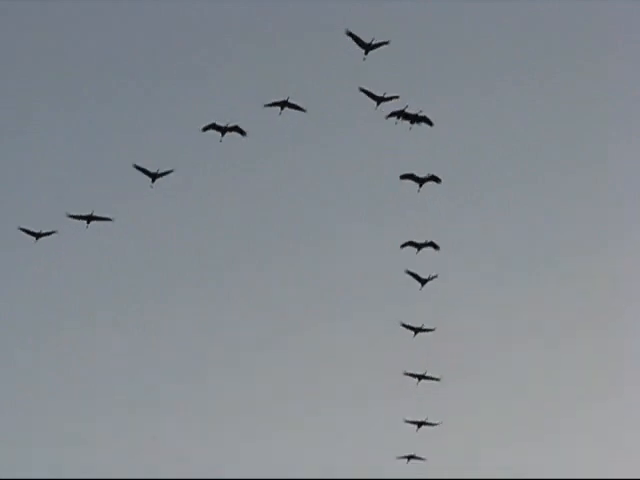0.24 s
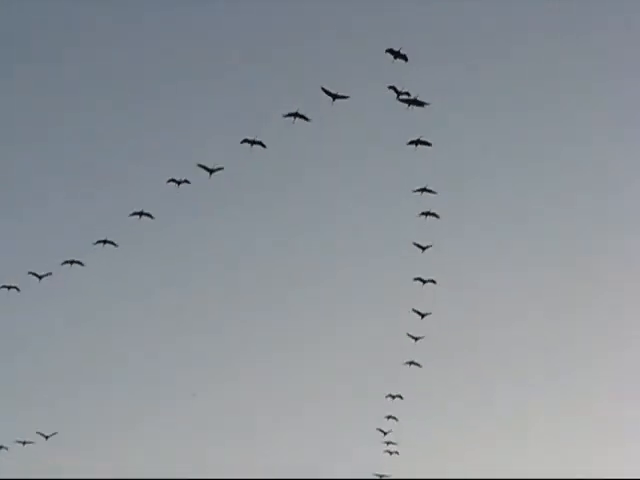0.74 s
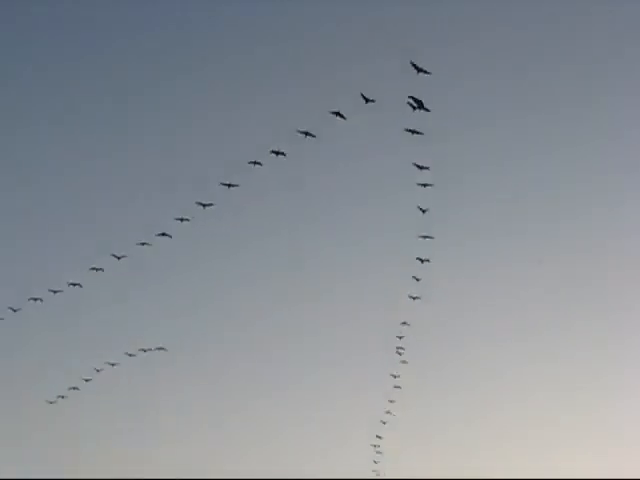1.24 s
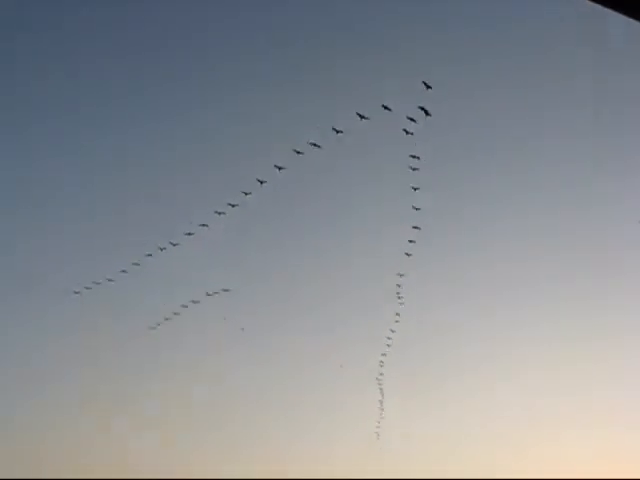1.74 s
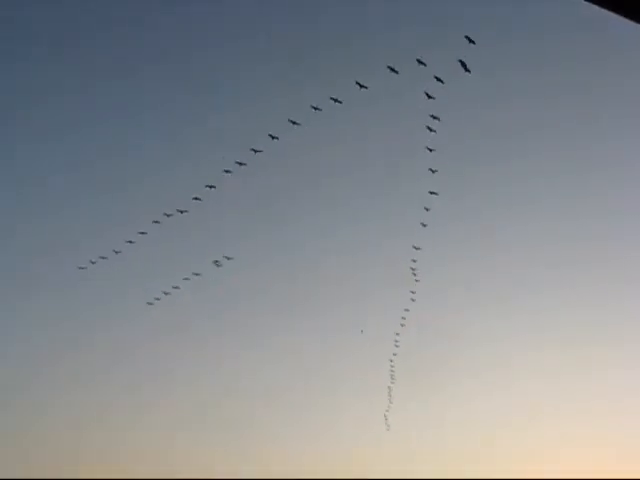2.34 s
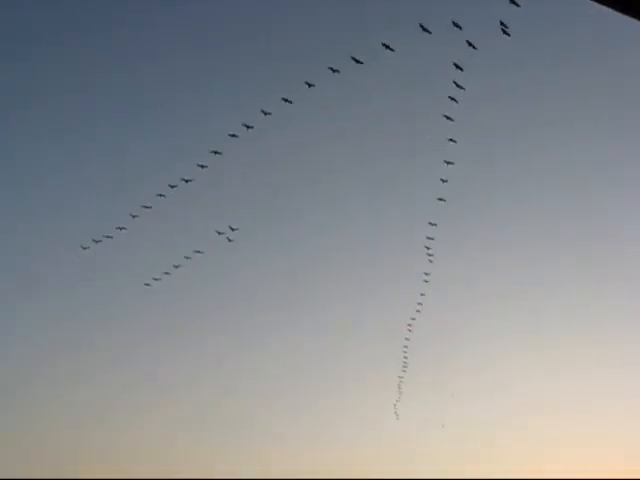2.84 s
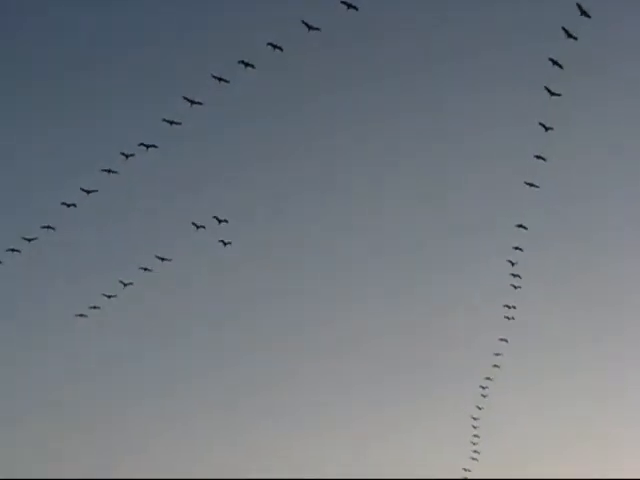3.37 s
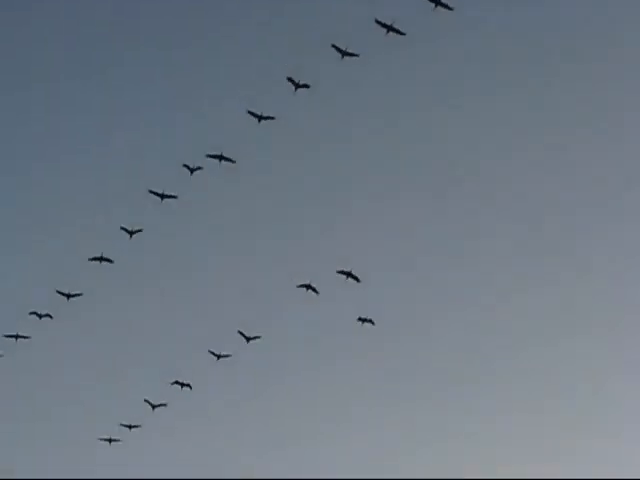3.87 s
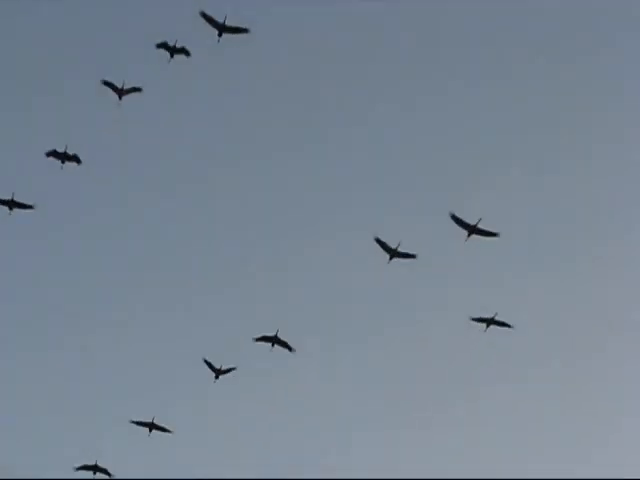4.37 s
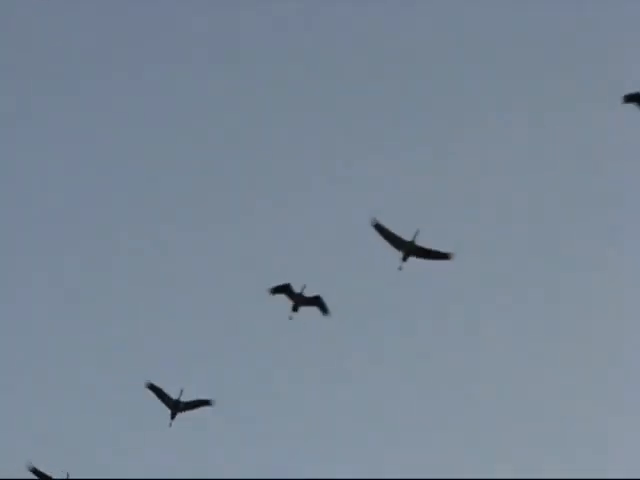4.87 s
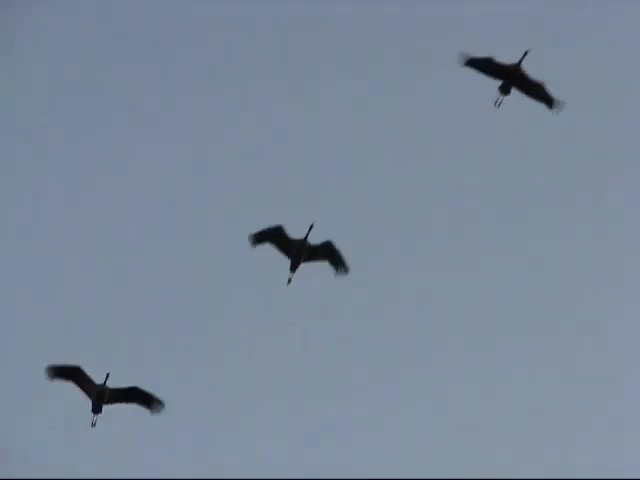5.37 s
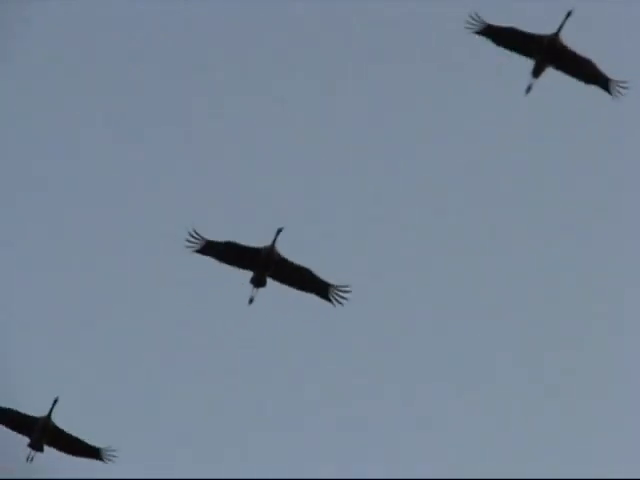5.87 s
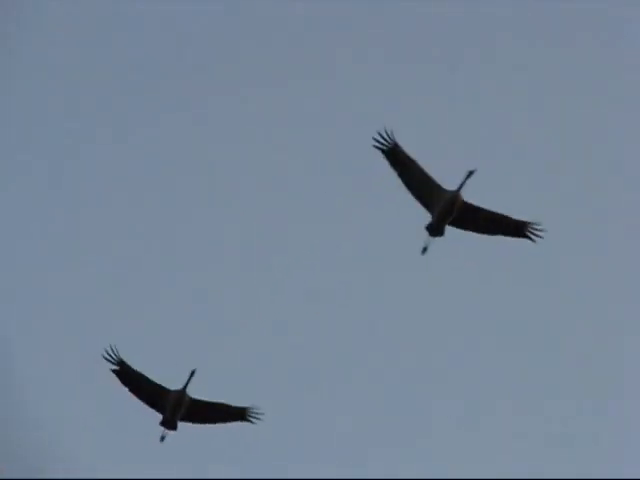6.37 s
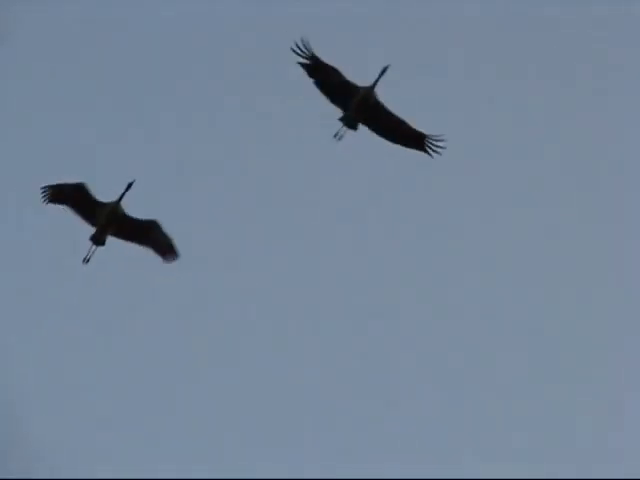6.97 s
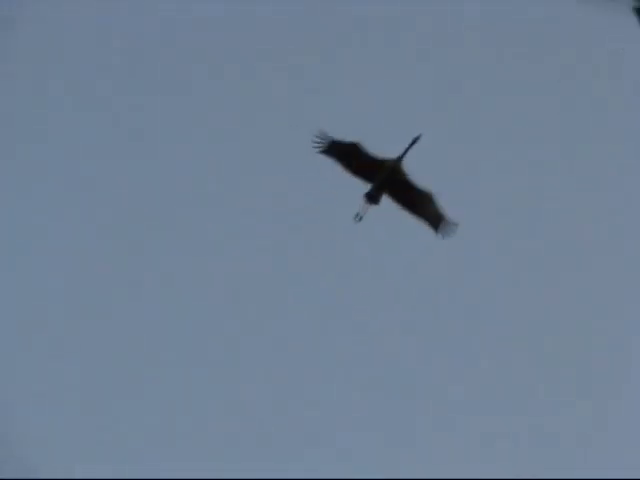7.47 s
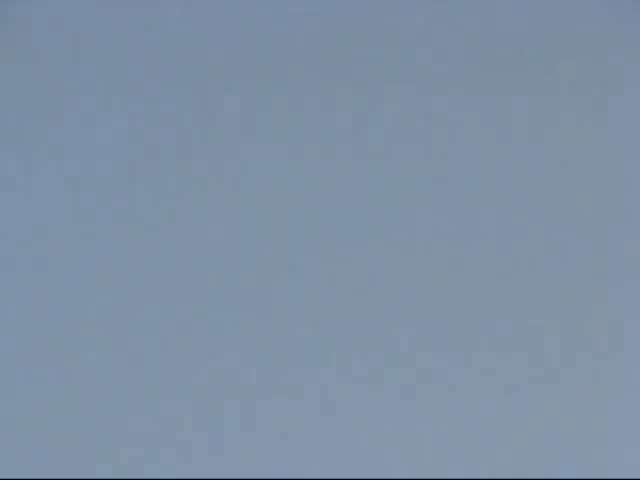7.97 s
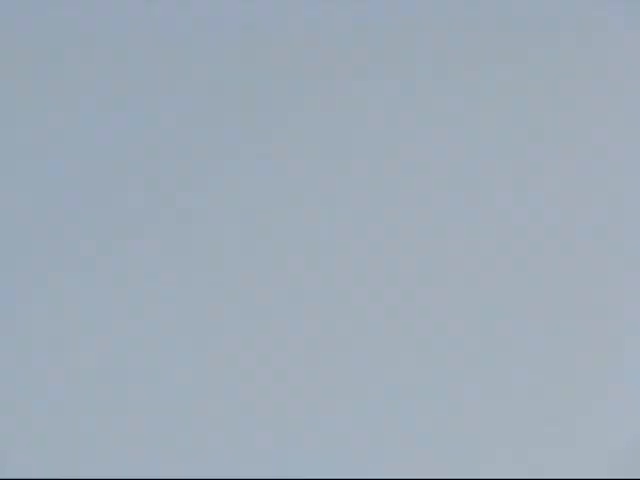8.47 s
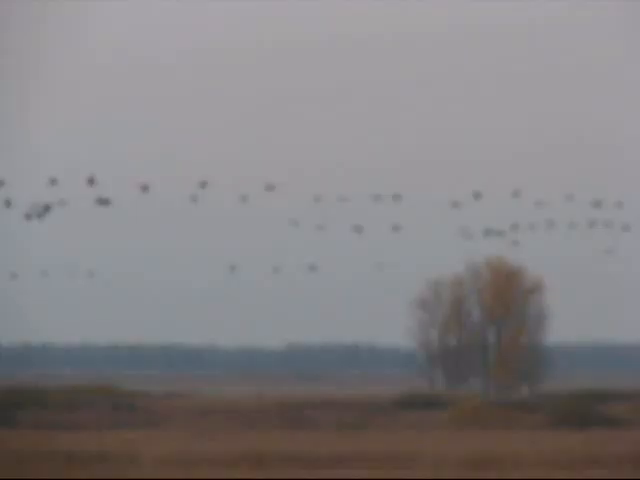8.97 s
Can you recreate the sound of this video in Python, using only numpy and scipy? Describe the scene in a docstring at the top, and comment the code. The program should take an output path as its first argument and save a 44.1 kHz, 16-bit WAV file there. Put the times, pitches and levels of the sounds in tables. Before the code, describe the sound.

Cranes bugle and whistle overhead in passing skeins above open wetland, with soft wind hiss and hard handling knocks close to the microphone.

```python
"""A soft wash of wind and hiss opens with knocks on a hand-held camera; skeins of cranes then pass overhead.
Adults bugle in rough, trilled harmonics, the young whistle nearly pure notes, and far flocks come as echoes.
Knocks ring the camera body, a slipping grip creaks in runs of snaps, and electronics whine near 8 kHz.
Gain control ducks after the hard knocks, and the level steps down just before the end."""
import sys
import numpy as np
from scipy import signal
from scipy.fft import rfft, irfft
from scipy.io import wavfile
from scipy.ndimage import uniform_filter1d

SR = 44100
rng = np.random.default_rng(int(sys.argv[2]) if len(sys.argv) > 2 else 0)


def dump(signal):
    """Clip the signal to [-1, 1] and save it as 16-bit WAV at the path in sys.argv[1]."""
    limited = np.clip(np.atleast_2d(signal).T, -1, 1)
    pcm = np.round(limited * 32767).astype(np.int16)
    wavfile.write(sys.argv[1], SR, pcm)


N = 406602
TIME = np.arange(N) / SR


def amp(db):
    """Decibels to gain."""
    return 10 ** (np.asarray(db) / 20)


def unit(x):
    """Scales to rms 1."""
    return x / np.sqrt(np.mean(x ** 2) + 1e-20)


def read(points, hz):
    """Reads a curve of (Hz, value) points on a log-frequency axis."""
    f, value = np.transpose(points)
    return np.interp(np.log(hz + 1), np.log(f + 1), value)


def colour(x, points):
    """Filters by a spectrum in dB."""
    gain = amp(read(points, np.fft.rfftfreq(x.shape[-1], 1 / SR)))
    return irfft(rfft(x) * gain, x.shape[-1])


def highpass(x, hz):
    """Third-order high-pass."""
    return signal.sosfilt(signal.butter(3, hz, "high", fs=SR, output="sos"), x)


def drift(size, hz):
    """Smooth random wander, mostly below hz, cut from one second of rms 1."""
    f = np.fft.rfftfreq(SR, 1 / SR)
    spectrum = rfft(rng.standard_normal(SR)) * np.exp(-(f / hz) ** 2)
    return unit(irfft(spectrum, SR))[:size]


def swell(t, peak_s):
    """Rises to 1 at peak_s and dies away."""
    return t / peak_s * np.exp(1 - t / peak_s)


def surge(peak_s, level_db, rise, fall):
    """A gain that climbs to its peak and sinks again, each at its own dB per second."""
    below_peak_db = np.maximum(rise * (peak_s - TIME), fall * (TIME - peak_s))
    return amp(level_db - below_peak_db.clip(0, 100))


def pan(lean_db):
    """Left and right gains with a mean of 1; a positive lean favours the left."""
    gains = amp([[lean_db / 2], [-lean_db / 2]])
    return gains / gains.mean()


def add(mix, s, sound):
    """Adds a sound at time s, cut off at the end of the mix."""
    part = mix[..., round(s * SR):][..., :sound.shape[-1]]
    part += sound[..., :part.shape[-1]]


def scatter(x, t60):
    """Open-air echo: sparse reflections from ground and trees, different at each side."""
    t = np.arange(SR // 2) / SR
    sparse = rng.standard_normal((2, len(t))) * (rng.random((2, len(t))) < .04)
    taps = sparse * amp(-60 * t / t60) * (t > .004)
    taps /= np.linalg.norm(taps, axis=1, keepdims=True)
    crossed = taps + .15 * taps[::-1]  # a little of each side reaches the other
    return signal.fftconvolve(x[None], crossed, axes=1)[:, :N]


# Tone of the wash: (frequency [Hz], relative level [dB])
WASH_COLOUR = [(15, -44), (25, -15.5), (92, -21), (317, -10.5), (575, -9.5), (863, -1.5), (2000, -9.5),
               (2160, -11.5), (2610, -12), (5000, -18.5), (7310, -22.5), (8140, -18.5), (8830, -25.5),
               (14800, -31), (16000, -76)]
# Likeness of the two sides: (frequency [Hz], correlation [0-1])
SIDE_LIKENESS = [(60, 0.53), (150, 0.73), (380, 0.84), (950, 0.29), (2380, 0.23), (5980, 0.039),
                 (15000, 0.23)]
# Stereo lean of the wash: (frequency [Hz], left over right [dB])
SIDE_LEAN = [(60, -2.5), (180, -1.5), (550, -2.5), (1650, -3.0), (4970, -1.5), (15000, 0.5)]
# Strength of the breeze before the band shares below: (time [s], level [dB])
BREEZE_LEVEL = [(0, -1.5), (1.4, 0), (3, 0), (4.6, 0), (6.1, 0), (6.7, -2), (7.8, -4), (8.1, 5),
                (8.35, 7.5), (8.75, -0.5), (9.2, -4.5)]
# How far each band follows the breeze: (frequency [Hz], share of its dB [0-1])
BREEZE_SHARE = [(150, 0.8), (700, 0.97), (4000, 0.96), (12000, 0.15)]
WASH_DB = -45.5  # overall rms


def wash(patchy_db=1.76, flicker_db=0.9):
    """Wind over the marsh and microphone hiss: noise shaped frame by frame, in drifting patches."""
    frames, hz = N // 256 + 5, np.fft.rfftfreq(1024, 1 / SR)
    a, b, c, d, patches = rng.standard_normal((5, frames, 513))
    patches = unit(uniform_filter1d(uniform_filter1d(patches, 9, axis=0), 10, axis=1))
    flicker = unit(uniform_filter1d(rng.standard_normal((frames, 1)), 5, axis=0))
    same = np.clip(read(SIDE_LIKENESS, hz), -1, 1)
    left = a + 1j * b
    right = same * left + np.sqrt(1 - same ** 2) * (c + 1j * d)
    half_lean_db = read(SIDE_LEAN, hz) / 2
    sides = np.array([left * amp(half_lean_db), right * amp(-half_lean_db)])
    level_db = read(WASH_COLOUR, hz) + patchy_db * patches + flicker_db * flicker
    breeze_db = np.interp(np.linspace(0, N / SR, frames), *np.transpose(BREEZE_LEVEL))
    sides = sides * amp(level_db + breeze_db[:, None] * read(BREEZE_SHARE, hz))
    noise = signal.istft(sides.swapaxes(1, 2), nperseg=1024, noverlap=768)[1][:, :N]
    return amp(WASH_DB) * unit(noise)


WHINE_HZ, FRAME_HZ = 7867.1, 29.97


def whine(level_db=-60):
    """An electronic tone whose phase flips at each picture frame, which makes it buzz."""
    flips = np.tanh(12 * np.sin(np.pi * FRAME_HZ * TIME))
    return amp(level_db) * unit(flips * np.sin(2 * np.pi * WHINE_HZ * TIME)) * pan(-9.5)


# Gusts on the microphone: (peak time [s], level [dB], rise [dB/s], fall [dB/s])
GUST_SURGES = [(4.84, -57, 400, 47), (8.52, -59, 123, 87), (9.08, -50, 226, 18)]


def buffet():
    """Low rumble of gusts, unrelated at each port."""
    rumble = colour(rng.standard_normal((2, N)), [(20, 6.5), (70, 2.5), (140, -3.0), (400, -27), (2000, -89)])
    return unit(rumble) * sum(surge(*gust) for gust in GUST_SURGES)


DRONE_PEAK_S, DRONE_DB = 5.92, -60
DRONE_RISE_DB_PER_S, DRONE_FALL_DB_PER_S = 3.5, 50


def drone():
    """A faint low drone far away: a narrow noise band that grows slowly and stops quickly."""
    spectrum = [(170, -44), (270, -14), (315, -2.0), (360, -11.0), (520, -20), (2000, -94)]
    band = colour(rng.standard_normal(N), spectrum)
    return unit(band) * surge(DRONE_PEAK_S, DRONE_DB, DRONE_RISE_DB_PER_S, DRONE_FALL_DB_PER_S)


def far_flock(count=30, level_db=-55, pitch_hz=900):
    """Many far birds, spread evenly with jitter and heard only by their echoes."""
    calls = np.zeros(N)
    for k, (when, voice, near) in enumerate(rng.random((count, 3))):
        hz = pitch_hz * 2 ** (0.95 * (voice - .5))
        call = bugle(0.174, hz, glide=0.0336, level_db=level_db - 10.0 * near, rough=0.63, trill=0.422,
                     bright_db=-5, upper_db=8.5)
        add(calls, (k + when) / count * N / SR, call)
    return scatter(calls, t60=0.72)


# Colour of skin on the shell: (frequency [Hz], relative level [dB])
BRUSH_COLOUR = [(300, -30), (2000, 3), (5600, 2), (7500, -8), (11000, -7), (15000, -17), (16500, -40)]
# Strokes of the palm: (peak time [s], level [dB], rise [dB/s], fall [dB/s])
BRUSH_STROKES = [(5.29, -50.5, 110, 86), (5.7, -56.5, 90, 25), (8.4, -61, 150, 30)]


def brushing(grain_db=3):
    """The palm brushes the shell: soft hiss with a grainy level."""
    grains = unit(uniform_filter1d(rng.standard_normal(N), size=200))
    hiss = colour(rng.standard_normal((2, N)), BRUSH_COLOUR) * amp(grain_db * grains)
    return unit(hiss) * sum(surge(*stroke) for stroke in BRUSH_STROKES)


# Colour of the grip's snaps: (frequency [Hz], relative level [dB])
SNAP_COLOUR = [(100, -44), (500, -19), (800, 2), (1200, 1), (1900, 1.5), (2500, 3), (3500, 5), (4400, -4),
               (6000, -9), (9000, -13.5), (13000, -42)]
SLIP_RISE_S, SLIP_HOLD = 0.0012, 0.8  # build-up time; share of the length before release


def slip(length, pitch_hz, squeak_db, snap_db, chatter_hz=340, chatter=0.71, uneven_db=3.0, grit=0.54,
         release_s=0.0042):
    """One slip of the grip: a fast, chattering run of tiny snaps, whose rate is heard as a squeak."""
    t = np.arange(SR // 25) / SR
    turns = np.cumsum(pitch_hz * (1 + .08 * drift(len(t), 400))) / SR
    beat = 1 + chatter * np.cos(2 * np.pi * (chatter_hz * t + rng.random()))
    grain = beat * amp(uneven_db * drift(len(t), 1200))
    clicks = np.diff(np.floor(turns), prepend=0)  # one per turn
    snaps = unit(colour(clicks * grain, SNAP_COLOUR))
    rub = unit(colour(rng.standard_normal((2, len(t))), SNAP_COLOUR))  # the sliding between the snaps
    release = np.exp(-np.maximum(t - SLIP_HOLD * length, 0) / release_s)
    press = np.minimum(t / SLIP_RISE_S, 1) * release
    squeak = amp(squeak_db) * np.cos(2 * np.pi * turns)
    return (squeak + amp(snap_db) * (snaps + grit * rub) / 2) * press * pan(-2.3)


# Slips of the grip: (time [s], nominal length [s], mean pitch [Hz], squeak gain [dB], snap gain [dB])
GRIP_SLIPS = [(2.4284, 0.0094, 1172, -33, -23), (2.4425, 0.012, 1093, -35, -25),
              (2.45, 0.007, 1150, -28, -32), (2.457, 0.013, 1138, -30, -41),
              (2.4695, 0.011, 1106, -35, -25.5), (2.4765, 0.01, 1153, -34, -22),
              (2.486, 0.0077, 1125, -31, -30), (2.492, 0.0052, 1150, -29, -23),
              (2.499, 0.0059, 1213, -25.5, -32), (2.508, 0.0078, 1103, -32, -41),
              (2.515, 0.0033, 1094, -25, -25.5), (2.5245, 0.0092, 1176, -29, -22),
              (2.539, 0.0093, 1173, -26.5, -30), (2.552, .008, 1160, -33, -30),
              (2.564, .006, 1103, -29, -28), (2.574, 0.0087, 1143, -33, -37), (2.585, 0.012, 904, -43, -37),
              (2.599, 0.022, 733, -37, -45)]


def creak(echo_db=-9):
    """The grip sticks and slips, then eases: the last slips are softer and lower."""
    out = np.zeros((2, N))
    for s, *row in GRIP_SLIPS:
        add(out, s, slip(*row))
    return out + amp(echo_db) * scatter(out.mean(0), t60=0.49)


def thud(t, thud_hz=490, peak_s=0.003):
    """The dull sound of the grip: a briefly swelling sine, only a cycle or a few long."""
    tone = np.sin(2 * np.pi * thud_hz * rng.normal(1, 0.0061) * t)
    return highpass(tone * swell(t, peak_s), 227)


# Colour of sliding contact: (frequency [Hz], relative level [dB])
SCRATCH_COLOUR = [(60, -62), (300, -36), (1200, 20.5), (1900, 6), (2450, 8.5), (2800, 11.5), (3500, 6.5),
                  (4400, 3), (5500, -3), (9000, -3.5), (15000, -25)]


def scratch(t, peak_s):
    """A puff of sliding contact on the shell, unrelated at each port."""
    return unit(colour(rng.standard_normal((2, len(t))), SCRATCH_COLOUR)) * swell(t, peak_s) / 2


# Modes of the camera body: (mean frequency [Hz], relative level [dB], time to fall 60 dB [s])
BODY_MODES = [(556, 2, 0.025), (729, -0.5, 0.052), (1003, 0.5, 0.05), (1278, 6.5, 0.019),
              (1842, -11.5, 0.068), (2413, -0.5, 0.011), (3140, -16, 0.028)]
THUD_DB = -28.5  # the grip's thud relative to the ring


def knock(t, ring_db, scratch_db, lean_db):
    """One touch: the body rings in a different phase at each port, the surfaces scratch, the grip thuds."""
    ring = 0
    for hz, db, t60 in BODY_MODES:
        mode_hz = hz * rng.normal(1, 0.035)
        port_phase = rng.normal(0, 1.0, (2, 1))
        ring = ring + amp(db - 60 * t / t60) * np.sin(2 * np.pi * mode_hz * t + port_phase)
    ring = highpass(ring * (1 - np.exp(-t / 0.000052)), 622)  # very short onset
    blow = ring / abs(ring).max() + amp(THUD_DB) * thud(t)
    return (amp(ring_db) * blow + amp(scratch_db) * scratch(t, peak_s=0.0011)) * pan(lean_db)


def tick(t, centre_hz, peak_s=0.00098, slope_db=14, tail_db=-20, tail_s=0.0093):
    """A tiny snap of the shell: noise sloping slope_db per octave around its centre, then a short rustle."""
    band = [(centre_hz / 8, -3 * slope_db), (centre_hz, 0), (centre_hz * 4, -2 * slope_db)]
    noise = unit(colour(rng.standard_normal((2, len(t))), band))
    return noise * (swell(t, peak_s) + amp(tail_db) * swell(t, tail_s)) / 2


# Knocks of the hand on the camera: (time [s], ring gain [dB], scratch gain [dB], left over right [dB])
HAND_KNOCKS = [ (0.047, -22.5, -15, -4.5), (0.221, -33, -52, -3), (0.282, -37, -52, -1),
               (0.343, -30.5, -40, -9), (0.411, -29, -47, -4), (2.044, -24, -29, -8),
               (2.301, -26, -18, -12), (2.3031, -9.5, -9, -3.5), (2.3053, -2.5, -10, -10.5),
               (2.309, -12, -21, 0), (2.831, -25, -32, -16), (3.358, -28.5, -54, -9), (3.523, -29, -45, -8),
               (6.269, -23, -41, -8), (6.297, -32, -52, -4), (6.324, -25.5, -37, -2), (6.452, -22, -27, -5),
               (6.491, -31, -31, -8), (7.9817, -10, -25, -12), (7.985, -13, -32, -8), (7.988, -6, -2, -7),
               (7.9898, 5.5, 0.5, -10.5), (7.9987, -12, -10, -1), (8.001, -7, -7, -1),
               (8.32, -27, -16.5, -2), (8.341, -28, -16, -10)]
# Thin dry ticks of the shell: (time [s], gain [dB], centre frequency [Hz])
SHELL_TICKS = [(5.664, -31, 3580), (5.689, -26.5, 7600), (5.962, -37.5, 8900), (6.115, -38, 12000),
               (6.61, -40, 12000), (7.506, -34, 4900), (7.768, -39, 8900)]
# Dull bumps of the hand: (time [s], gain [dB], mean pitch [Hz], time to peak [s])
HAND_BUMPS = [(0.047, -24, 500, 0.00084), (2.3035, -14.5, 590, 0.0018), (2.3055, -5.5, 1038, 0.00094),
              (7.9815, -14, 880, 0.0015), (7.99, -26, 705, 0.0017), (7.9911, -3, 1390, 0.00041),
              (2.449, -35, 520, .004), (2.982, -47, 393, 0.0037), (4.447, -29, 383, 0.0006),
              (5.869, -43, 324, 0.0054), (6.492, -37, 327, 0.00077), (6.513, -43.5, 264, 0.0034),
              (6.535, -46, 247, 0.0029), (8.312, -21.5, 483, 0.00044), (8.504, -19, 490, 0.00031),
              (9.097, -33.5, 393, 0.00047)]
PUSH_DB = -25  # low push of air relative to its bump


def handling(echo_db=-27):
    """Knocks, ticks, bumps and a stick-slip creak, carried through the body to the microphone."""
    out = creak()
    t = np.arange(SR // 12) / SR
    for s, *row in HAND_KNOCKS:
        add(out, s, knock(t, *row))
    for s, level_db, centre_hz in SHELL_TICKS:
        add(out, s, amp(level_db) * tick(t, centre_hz) * pan(-0.86))
    for s, level_db, thud_hz, peak_s in HAND_BUMPS:
        bump = thud(t, thud_hz, peak_s) + amp(PUSH_DB) * swell(t, 0.00093)
        add(out, s, amp(level_db) * bump * pan(-7))
    return out + amp(echo_db) * scatter(out.mean(0), t60=.15)


def peep(length, pitch_hz, glide, level_db, waver=0.016, flutter_db=4):
    """A faint, quavering note on a straight glide."""
    u = np.linspace(-.5, .5, round(length * SR))
    hz = pitch_hz * (1 + glide * u + waver * drift(len(u), 300))
    tone = np.sin(2 * np.pi * np.cumsum(hz) / SR) * amp(flutter_db * drift(len(u), 50))
    return amp(level_db) * unit(tone * signal.windows.tukey(len(u), .3))


# Tune shared by all whistles: (share of length [0-1], pitch [ratio], relative level [dB])
WHISTLE_TUNE = [(0, .97, -10), (.03, 1, -4), (.072, .8, -2), (.105, 1, 1), (.14, 1.01, 1), (.175, 1.13, 3),
                (.235, .98, -5), (.29, .945, -5), (.345, 1.025, -2), (.39, .87, 0), (.42, 1, 2),
                (.48, 1.01, 2.5), (.55, 1.08, 3), (.59, 1.04, 0), (.675, .91, 0), (.76, .935, 2),
                (.85, .885, 0), (1, .78, -6)]
FALL_FROM, FALL_SETTLE = 0.529, 0.064  # start and settling time of the closing fall [share of length]
# second harmonic of a whistle at OCTAVE_AT_DB; softer whistles lose OCTAVE_FOLLOW dB of it per dB
OCTAVE_DB, OCTAVE_AT_DB, OCTAVE_FOLLOW = -12, -36, 0.5


def whistle(length, pitch_hz, level_db, tail_db, warble=0.012, flutter_db=2):
    """A thin, nearly pure note: two scooped, quavering flicks, then a steadier fall."""
    u = np.linspace(0, 1, round(length * SR))
    at, ratios, dbs = np.transpose(WHISTLE_TUNE)
    fall = np.clip((u - FALL_FROM) / FALL_SETTLE, 0, 1)
    waver = 1 + warble * (1 - fall / 2) * drift(len(u), 320)
    phase = 2 * np.pi * np.cumsum(pitch_hz * np.interp(u, at, ratios) * waver) / SR
    octave_db = OCTAVE_DB + OCTAVE_FOLLOW * (level_db - OCTAVE_AT_DB)
    tone = np.sin(phase) + amp(octave_db) * (np.sin(2 * phase) + amp(-18) * np.sin(3 * phase))
    effort_db = np.interp(u, at, dbs) + tail_db * fall + flutter_db * drift(len(u), 170)
    return amp(level_db) * unit(tone * amp(effort_db) * signal.windows.tukey(len(u), .06))


# Whistles of the young: (time [s], length [s], base pitch [Hz], level [dB],
#   echo send relative to it [dB], closing fall relative to the tune [dB])
YOUNG_WHISTLES = [ (1.977, 0.14, 4120, -38, -4, -1), (2.145, 0.12, 4120, -49, -8, -17),
                  (2.232, 0.042, 3680, -50.5, 4, -5), (3.811, 0.13, 3974, -39, -3, 0.5),
                  (5.015, 0.048, 3480, -55.5, 3, -16), (5.062, 0.165, 3950, -47, -3, 0.5),
                  (5.11, 0.14, 4620, -50.5, 1.5, -1), (6.355, 0.17, 3723, -50.5, 2.5, -1.5),
                  (6.406, .19, 3615, -59.5, 5.5, 0), (7.843, 0.12, 3920, -48, 6, 0.5),
                  (7.903, 0.14, 4380, -46.5, 3, 5), (8.594, 0.12, 4360, -47, 1, -6),
                  (8.662, 0.1, 3640, -52.5, -1, 1)]
# Thin peeps of far birds: (time [s], length [s], mid pitch [Hz], glide [share of pitch], echo send level [dB])
FAR_PEEPS = [(6.45, 0.19, 5790, -.085, -63.5), (7.09, 0.244, 3560, -0.014, -60),
             (0.333, .045, 3470, -0.0045, -55), (0.395, .05, 3650, 0.042, -53),
             (5.195, .04, 3500, 0.015, -45.5)]


def young(air_loss_db=-8, blur=0.042):
    """Young birds, each direct and as an echo with more waver and less treble; far peeps are echo only."""
    direct, sent = np.zeros(N), np.zeros(N)
    for s, length, pitch_hz, level_db, echo_db, tail_db in YOUNG_WHISTLES:
        add(direct, s, whistle(length, pitch_hz, level_db, tail_db))
        add(sent, s, whistle(length, pitch_hz, level_db, tail_db, warble=blur) * amp(echo_db))
    for s, *row in FAR_PEEPS:
        add(sent, s, peep(*row))
    sent = colour(sent, [(5000, 0), (7500, air_loss_db)])
    return direct * pan(-1) + scatter(sent, t60=.24)


# Windpipe and bill of an adult: (frequency [Hz], relative level [dB])
THROAT_COLOUR = [(400, 34), (750, 1.5), (1100, 10.5), (1600, -5), (2400, -6.5), (3400, -6), (4300, -11),
                 (6000, -17), (9000, -55)]
TRILL_PER_S, TRILL_SWING, TRILL_DB = 21.4, 0.076, 6  # at trill 1: mean rate, pitch swing [share], level swing
ARCH, ARCH_PER_GLIDE = 0.0255, 0.255  # droop of both ends [share of pitch]; wide glides bend more
UPPER_FALL_DB = -2.2  # slope per harmonic from the third up, before the throat


def bugle(length, pitch_hz, glide, level_db, rough, trill, bright_db, upper_db, jitter=0.0555, rasp=1.0,
          uneven_db=-0.5):
    """Harmonics on a pitch arch; trill rolls flick it up and louder, uneven membrane beats make it rasp."""
    size = round(length * SR)
    u = np.linspace(-1, 1, size)
    arch = pitch_hz * (1 + glide * u / 2 - (ARCH + ARCH_PER_GLIDE * abs(glide)) * u ** 2)
    beat = 2 * np.pi * TRILL_PER_S * rng.normal(1, 0.0068) * np.arange(size) / SR
    roll = -trill * np.cos(beat + 0.725 * (1 - np.cos(beat)))  # each roll rises faster than it falls
    hz = arch * (1 + TRILL_SWING * roll + jitter * rough * drift(size, 221))
    turns = np.cumsum(hz) / SR
    harmonics_db = [0, bright_db]
    for k, z in enumerate(rng.standard_normal(size=4)):
        harmonics_db.append(upper_db + UPPER_FALL_DB * k + uneven_db * z)
    voice = np.zeros(size)
    for k, db in enumerate(harmonics_db, 1):
        gain = amp(read(THROAT_COLOUR, k * arch) + db + 3.2 * drift(size, 64))
        voice += gain * np.sin(2 * np.pi * (k * turns + rng.random()))
    roughness = 1 + rasp * rough * drift(size, 300)
    effort = amp(TRILL_DB * roll) * roughness * signal.windows.tukey(size, .18)
    return amp(level_db) * unit(voice * effort)


# Adult calls: (time [s], length [s], pitch at the middle [Hz], glide from start to end [share of pitch],
#   level before the direct and echo gains [dB], roughness [0-1], trill depth [1 = full],
#   second harmonic before the throat [dB], higher harmonics before the throat [dB])
ADULT_CALLS = [ (0.44, .14, 758, 0.0063, -42.5, 0.26, 0.17, 3, -1.5),
               (0.53, .11, 737.4, -0.048, -42.5, 0.2, 0.07, -3, -5),
               (0.63, 0.067, 947, -0.061, -46.5, 0.1, 0, -10, -4),
               (0.727, 0.14, 811, -0.043, -41.5, 0.27, 0.33, 4, 3.5),
               (0.828, 0.12, 966, 0.12, -37.5, 0.62, 0.45, -0.5, -2.5),
               (0.918, 0.04, 1305, -0.081, -39, 0.2, 0.16, 1, -10),
               (0.94, 0.11, 1008, -0.071, -36, 0.2, 0.09, 5, 1.5),
               (1.056, 0.068, 890, -0.035, -42.5, 0.13, 0.1, -1, 0.5),
               (1.09, 0.11, 1042, -0.11, -49.5, 0.6, 0.1, 11, 0),
               (1.917, .17, 1080, -0.042, -44, 0.85, 0.37, 7, 7),
               (3.268, 0.14, 1086, 0.00087, -44, 0.27, 0.2, 11, -5),
               (3.387, 0.058, 920, -0.044, -40, 0.16, 0, -1, -12),
               (4.055, 0.188, 839, 0, -43, 0.25, 0.12, -2.5, -1.5),
               (4.07, 0.14, 789, -0.0052, -43, 0.25, 0.13, -4, -5),
               (4.355, 0.094, 1133, -0.01, -41.5, 0.08, 0.08, -2, -5),
               (5.255, 0.14, 1072, -0.037, -41, 0.54, 0.16, 3.5, 0),
               (6.637, 0.14, 817, 0.085, -45.5, 0.23, 0.84, -4, -5),
               (6.781, 0.11, 927, -0.16, -42.5, 0.21, 0.23, 8, -6),
               (6.785, 0.075, 768, -0.02, -49, 0.15, 0.14, -8, -10),
               (6.973, 0.127, 1115, 0.0092, -42, 0.41, 0.07, 5.5, -6),
               (7.112, 0.1396, 1080, -0.104, -43, 0.51, .5, 5, -4),
               (7.243, 0.087, 925, -0.13, -49, 0.2, 0.13, 16, -10),
               (7.347, 0.11, 922, 0.024, -51, 0.3, 0.17, 15, -8),
               (7.504, 0.074, 749, -0.04, -41.5, 0.44, 0.33, 7.5, -2),
               (7.558, 0.17, 850, 0.071, -40.5, 0.17, 1.14, -1, -8.5),
               (7.718, 0.092, 786, -0.087, -44.5, 0.02, 0.12, -3, -7),
               (7.941, 0.13, 766, -0.038, -37, 0.28, 0, -9, -5),
               (8.01, 0.21, 806, -0.12, -35, 0.18, 0.63, -7, -1.5),
               (8.323, 0.17, 862, -0.074, -35, 0.59, 0.39, 0, 0.5),
               (8.726, 0.12, 881, -0.062, -47, 1, 0.43, 8.5, 10)]
# a neighbour's answer: relative level, mean delay, pitch spread [share]
ANSWER_DB, ANSWER_LAG_S, ANSWER_SPREAD = -10, .045, .07


def adults(direct_db=-4.0, echo_db=-6.5):
    """The nearer birds of the skein; a neighbour joins each call at a slightly different pitch."""
    calls = np.zeros(N)
    for s, length, pitch_hz, glide, level_db, *voice in ADULT_CALLS:
        add(calls, s, bugle(length, pitch_hz, glide, level_db, *voice))
        lag = ANSWER_LAG_S * (.5 + rng.random())
        answer_hz = pitch_hz * (1 + ANSWER_SPREAD * rng.standard_normal())
        add(calls, s + lag, bugle(length, answer_hz, glide, level_db + ANSWER_DB, *voice))
    return amp(direct_db) * calls * pan(-0.81) + amp(echo_db) * scatter(calls, t60=0.29)


def scene():
    """Birds and air, with the camera's own noises."""
    air = wash() + buffet() + drone()
    camera = whine() + brushing() + handling()
    birds = far_flock() + young() + adults()
    return air + camera + birds


DROP_S, EDGE_HZ = 9.105, 16200  # time of the level step; upper edge of the sound


def record(dry, threshold_db=-27, squeeze=0.6, recovery_db=17, drop_db=-9):
    """Gain control ducks and recovers at recovery_db per second, peaks clip, a low-pass trims the top."""
    power = signal.lfilter(np.ones(700) / 700, 1, (dry ** 2).mean(0))
    over_db = np.maximum(10 * np.log10(abs(power) + 1e-12) - threshold_db, 0)
    recovery = TIME * recovery_db
    duck_db = np.maximum.accumulate(squeeze * over_db + recovery) - recovery
    duck_db = signal.lfilter(np.ones(400) / 400, 1, duck_db)  # soften the steps
    step_db = drop_db * (TIME > DROP_S)
    out = np.clip(dry * amp(step_db - duck_db), -1, 1)
    lowpass = signal.firwin(511, EDGE_HZ, window=("kaiser", 9), fs=SR)
    return signal.oaconvolve(out, lowpass[None], "same")


dry = scene()
out = record(dry)
dump(out)
```